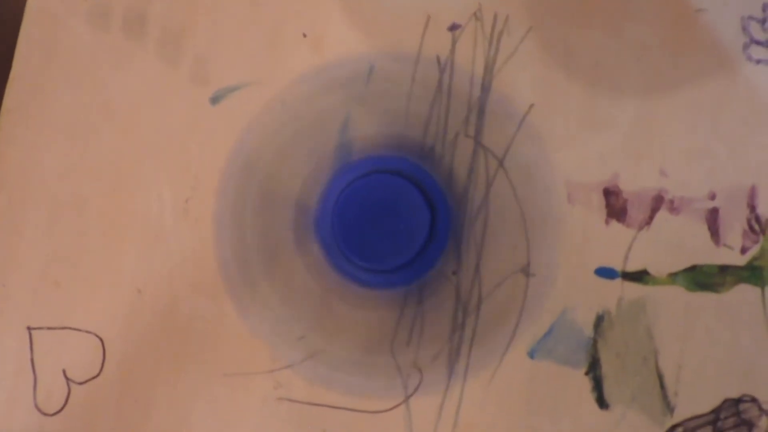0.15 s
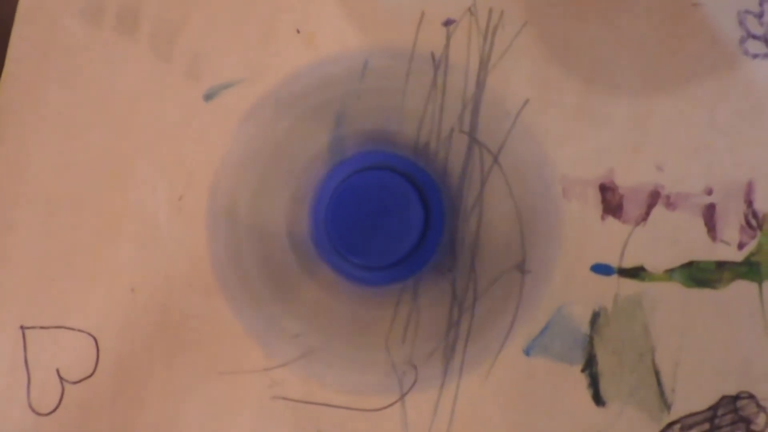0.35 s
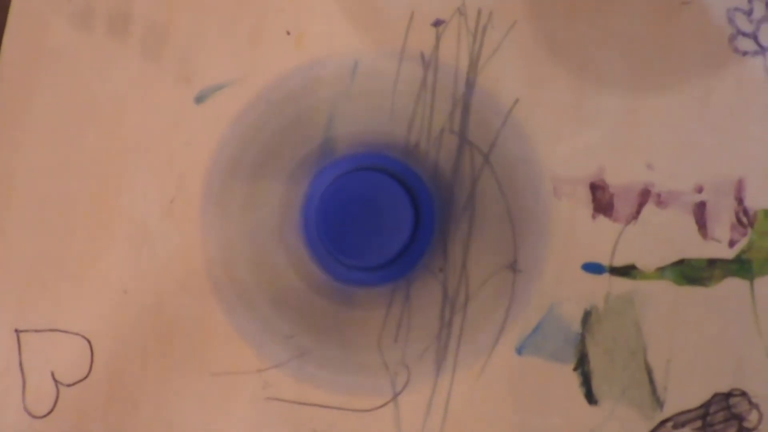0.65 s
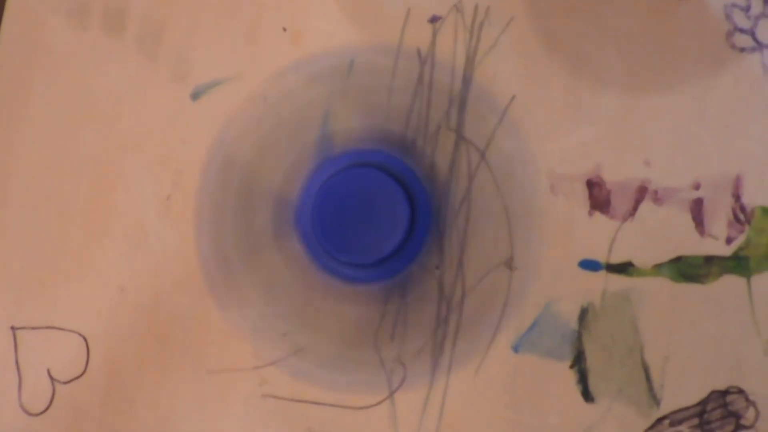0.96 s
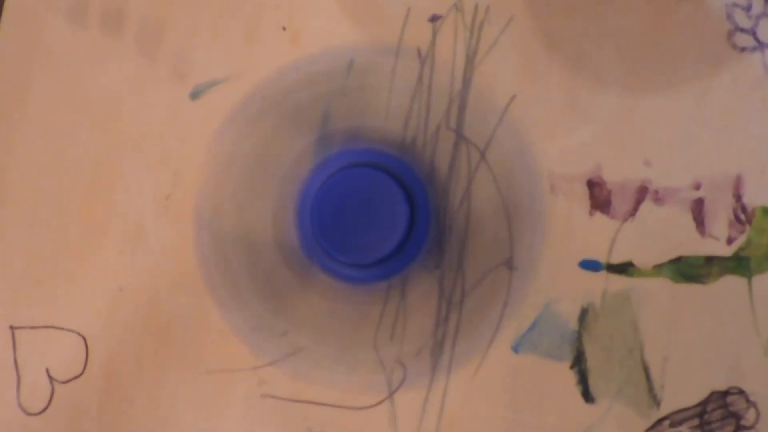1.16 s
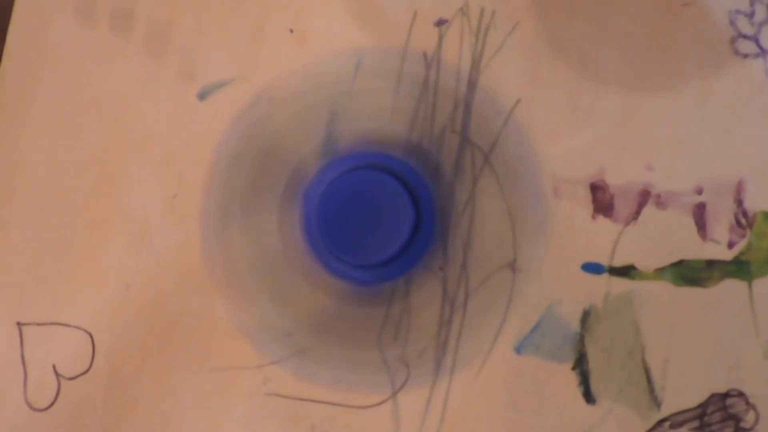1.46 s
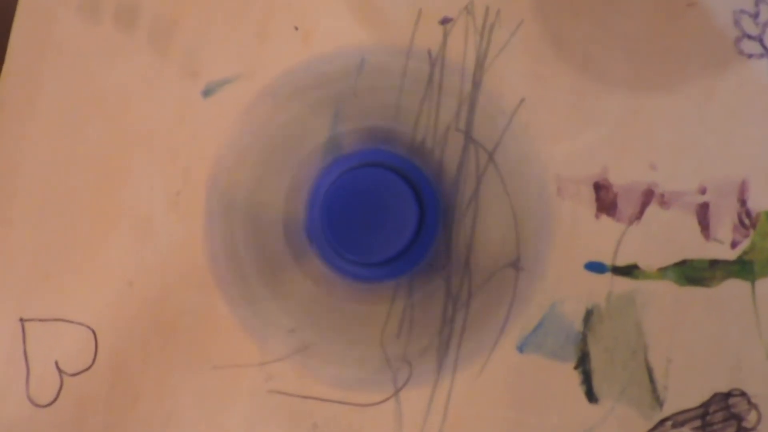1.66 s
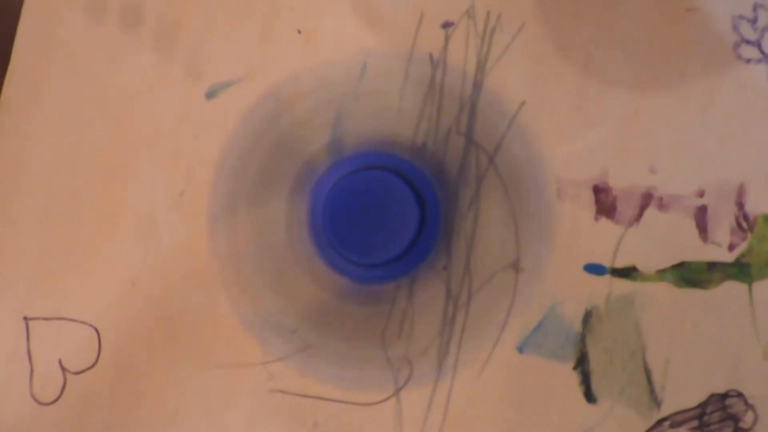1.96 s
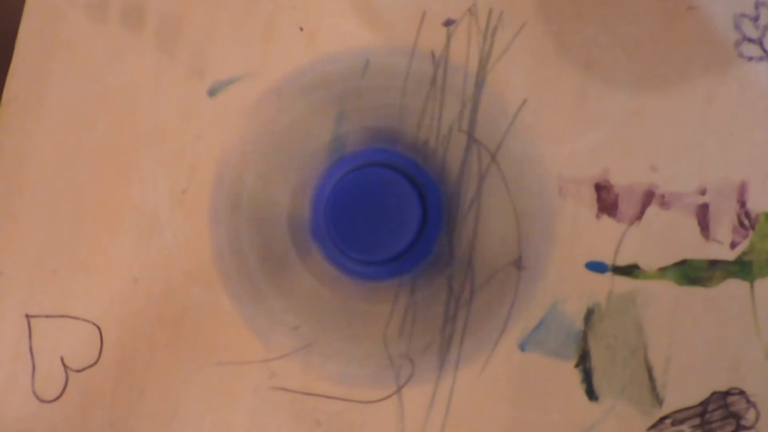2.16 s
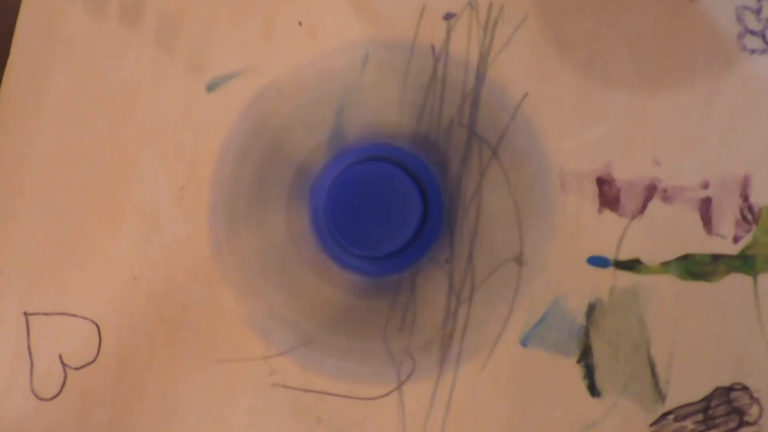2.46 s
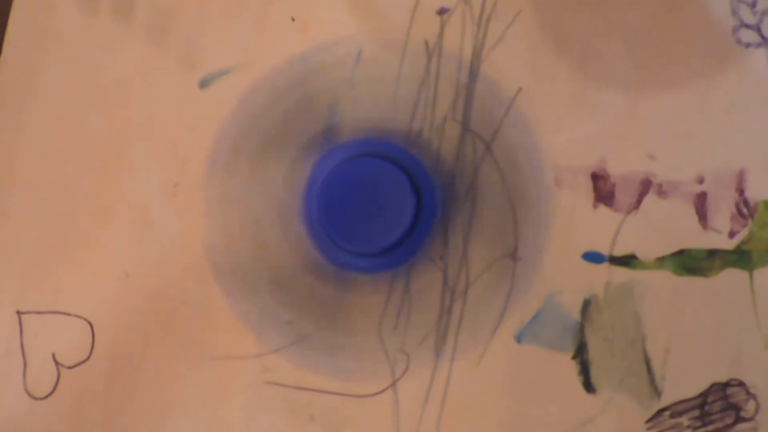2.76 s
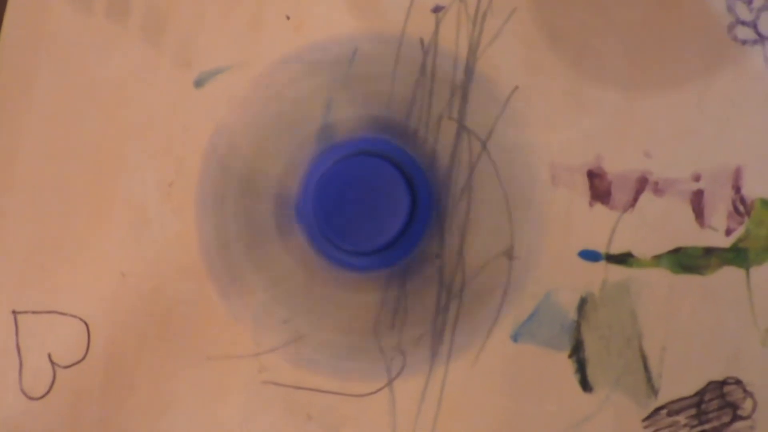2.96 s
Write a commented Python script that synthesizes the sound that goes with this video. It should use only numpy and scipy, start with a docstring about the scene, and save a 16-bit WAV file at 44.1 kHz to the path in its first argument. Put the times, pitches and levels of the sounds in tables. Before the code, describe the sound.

A toy spinner whirs on a paper-covered table, close to the microphone in a quiet room. Its bearing throbs rapidly and sinks slightly in pitch, with a light hiss and faint, scattered metallic pings.

```python
"""On a paper-covered table in a quiet room, a toy spinner coasts close to the microphone, slowly
losing speed. Six balls roll over the rough races of its bearing and drive the resonances of the
plastic body and the table top: a whir that throbs once a turn. Wavy races add sinking tones,
skidding balls add wavering ones, and now and then a ball catches and rings. The cage hisses as it
slides, the bearing has a thin metallic ring, and a faint low hum lies underneath."""
import sys
import numpy as np
from scipy import signal
from scipy.fft import rfft, irfft
from scipy.io import wavfile
from scipy.ndimage import map_coordinates

SR = 44100
rng = np.random.default_rng(int(sys.argv[2]) if len(sys.argv) > 2 else 0)


def file_out(sig):
    """Save sig as 16-bit WAV at sys.argv[1]."""
    # one column per channel
    cols = np.atleast_2d(sig).T
    # limit, then scale
    lim = np.clip(cols, -1, 1)
    pcm = np.round(lim * 32767).astype(np.int16)
    wavfile.write(sys.argv[1], SR, pcm)


N = 136710
BIN_HZ = np.fft.rfftfreq(N, 1 / SR)
SIDES = np.array([[.5], [-.5]])  # splits a left-minus-right difference between the channels

TURN_HZ, SLOWING_PER_S = 25.332, .0194  # starting speed and the share of it lost each second
BALLS, CAGE_RATIO = 6, .615  # the cage makes this part of a turn for each turn of the rotor
RING_PAN_DB = 3.5  # metallic ring and catches are louder on the left


def undb(db):
    """Decibels to amplitude gain."""
    return 10 ** (np.asarray(db) / 20)


def level(x, db):
    """Scale to an rms level."""
    return x * undb(db) / np.sqrt(np.mean(x ** 2))


def curve(points):
    """Interpolate (Hz, value) points over the spectrum on a log-frequency axis."""
    hz, value = np.array(points, float).T
    return np.interp(np.log(BIN_HZ + 1), np.log(hz), value)


def bump(hz, width):
    """Gaussian band of unit height over the spectrum."""
    return np.exp(-.5 * ((BIN_HZ - hz) / width) ** 2)


def causal(gain):
    """Causality: the minimum-phase response with this gain rings only after the push."""
    cepstrum = irfft(np.log(gain), N)
    cepstrum[1:N // 2] *= 2
    cepstrum[N // 2 + 1:] = 0
    return np.exp(rfft(cepstrum))


def walk(rate_hz):
    """Low-passed noise: a smooth random wander of unit rms."""
    lowpass = np.exp(-(BIN_HZ / rate_hz) ** 2)
    return level(irfft(rfft(rng.standard_normal(N)) * lowpass, N), 0)


def stereo_noise(colour, shared):
    """Partial coherence: coloured noise with a share of its power common to both channels."""
    noise = rng.standard_normal((3, N))
    pair = np.sqrt(shared) * noise[0] + np.sqrt(1 - shared) * noise[1:]
    return irfft(rfft(pair) * undb(curve(colour)), N)


def reflect(x, t60_s, send):
    """Diffuse reflection adds an exponentially decaying tail, different in each channel."""
    tail = rng.standard_normal((2, N)) * np.exp(-np.log(1000) * np.arange(N) / SR / t60_s)
    tail /= np.sqrt(np.sum(tail ** 2, axis=1, keepdims=True))
    return x + irfft(rfft(x) * rfft(tail) * send, N)


def background(t):
    """Ambient noise floor: the broadband air of the room and a faint low hum."""
    # spectrum of the still air: frequency_hz, density_db
    air_spectrum = [(15, -4.5), (42, -4), (75, -2), (130, -8), (320, -7), (600, -21.5), (2000, -21.5),
                    (15000, -35.5)]
    # partials of the hum: pitch_hz, level_db
    hum_partials = [(30, -64.5), (60, -70.5)]
    hum = sum(level(np.sin(2 * np.pi * (hz * t + rng.random())), db) for hz, db in hum_partials)
    return hum + level(stereo_noise(air_spectrum, shared=.66), db=-59)


def cage_hiss(turns):
    """Sliding friction of the cage makes broadband noise that sways with rotor and cage."""
    # spectrum of the friction: frequency_hz, density_db
    hiss_spectrum = [(2000, 4.5), (4200, -5), (5000, 2), (5400, 3.5), (6400, 3), (7300, -2.5), (8100, -3.5),
                     (9200, 1.5), (11200, -4.5), (13000, -3), (14200, -0.5), (15700, -4)]
    # thin resonances in the hiss: centre_hz, width_hz, gain_db
    hiss_peaks = [(4910, 62, 8.5), (6170, 220, 4), (9090, 110, 4.5)]
    sheen = undb(sum(db * bump(hz, width) for hz, width, db in hiss_peaks))
    hiss = irfft(rfft(stereo_noise(hiss_spectrum, shared=.17)) * sheen, N)
    hiss = reflect(hiss, t60_s=.069, send=undb(-4.5))  # off the table and the recorder
    sway_db = .5 * np.cos(2 * np.pi * (1 - CAGE_RATIO) * turns) - .3 * np.cos(2 * np.pi * turns)
    return level(hiss * undb(sway_db), db=-55.5)


def metal_ring(force, t, turns):
    """Narrow resonance of the bearing, driven by the contact force; it pings with rotor and cage."""
    # swell and ebb of the ring: time_s, level_db
    ring_levels = [(0, -55), (.45, -56), (1.0, -54.3), (1.45, -54.5), (1.8, -56), (2.4, -55), (3.1, -57)]
    ring_hz, width_hz, ping_at_turns = 2487, 44, .55
    response = bump(ring_hz, 2 * width_hz) / (1 + 2j * (BIN_HZ - ring_hz) / width_hz)
    rates = (1, CAGE_RATIO, 1 - CAGE_RATIO)  # rotor, cage, rotor past cage
    ping_db = 1.5 * sum(np.cos(2 * np.pi * (rate * turns - ping_at_turns)) for rate in rates)
    ring = level(irfft(rfft(force * undb(ping_db)) * response, N), 0)
    return ring * undb(np.interp(t, *np.array(ring_levels).T) + SIDES * RING_PAN_DB)


def catches(t):
    """Transient excitation: a ball catches, and one resonance swells quickly and dies away."""
    # rings of the catching balls: peak_s, pitch_hz, level_db
    catch_rings = [(.108, 2460, -52), (.375, 2480, -51), (.388, 760, -43), (.486, 1775, -47),
                   (0.927, 1320, -43), (.929, 2840, -50.5), (1.063, 2470, -48), (1.064, 1780, -45),
                   (1.103, 2460, -49), (1.204, 1314, -47), (1.264, 2480, -52), (1.388, 2490, -46),
                   (1.428, 1735, -48), (1.466, 2530, -46), (1.593, 2490, -47), (1.738, 1357, -42),
                   (1.923, 742, -40), (1.979, 1743, -45), (2.002, 720, -50), (2.006, 1325, -46),
                   (2.077, 1765, -47), (2.086, 730, -44), (2.3, 1335, -43), (2.333, 1357, -46),
                   (2.391, 1310, -51), (2.427, 1380, -52), (2.533, 2480, -47), (2.548, 1390, -56),
                   (2.658, 2790, -49), (2.789, 760, -47.5), (2.813, 1303, -43), (3.012, 1315, -46)]
    rise_s = .013
    rings = 0
    for (peak_s, hz, db), phase in zip(catch_rings, rng.random(len(catch_rings))):
        age = np.maximum((t - peak_s) / rise_s + 1, 0)
        envelope = undb(db) * (age * np.exp(1 - age)) ** 2
        rings += envelope * np.sqrt(2) * np.sin(2 * np.pi * (hz * (t - peak_s) + phase))
    return rings * undb(SIDES * RING_PAN_DB)


def skid_tones(turns):
    """Phase modulation: skidding balls sing with a wavering pitch and beat against the race tones."""
    # tones of the skidding balls: cycles_per_turn, level_db
    tones = [(30.5, -58.5), (44.3, -58), (54.5, -57.5)]
    waver_cycles = .26
    return sum(level(np.sin(2 * np.pi * (order * turns + waver_cycles * walk(rate_hz=6.1))), db)
               for order, db in tones)


def race_tones(turns):
    """Periodic forcing: wavy races sound harmonics of the turn rate, some shifted by the ball passes."""
    # harmonics of the wavy races: cycles_per_turn, level_db
    waviness = [(7, -70), (8, -75.5), (9, -65), (10, -69), (12, -66.5), (17, -73), (18, -68.5), (20, -65.5),
                (25, -61.5), (29, -67), (30, -54), (32, -63.5), (35, -69), (36, -57.5), (44, -55)]
    # passing balls beating with the turning race: cycles_per_turn_above_ball_pass, level_db
    ball_tones = [(29, -61.5), (32, -64), (35, -65), (38, -72), (41, -63), (42, -65.5), (43, -70.5),
                  (44, -59), (50, -69), (52, -63.5), (53, -72)]
    ball_pass, flutter_db = BALLS * (1 - CAGE_RATIO), 1.5
    tones = 0
    for order, db in waviness + [(order + ball_pass, db) for order, db in ball_tones]:
        tone = np.sin(2 * np.pi * (order * turns + rng.random()))
        tones += level(tone * undb(flutter_db * walk(rate_hz=15)), db)
    return tones


def rough_track(laps, starts, bumps):
    """Roughness excitation: contacts circle one ring and meet the same bumps on every lap."""
    profile = rng.standard_normal(bumps)
    contacts = (map_coordinates(profile, [(laps + start) % 1 * bumps], order=1, mode="grid-wrap")
                for start in starts)
    return level(sum(contacts), 0)


def bearing_force(turns):
    """Rolling contact: balls on both races, rotor rub and random slip sum to a fluctuating force."""
    # rough spots, struck once a turn, where the force jumps: position_turns, decay_turns, jump_db
    rough_spots = [(0.191, 0.095, 5), (0.558, 0.11, 1.5), (0.688, 0.095, 4.5), (.94, 0.01, 7.5)]
    seats = (np.arange(BALLS) + .033 * rng.standard_normal(BALLS)) / BALLS
    cage_turns = CAGE_RATIO * turns + .005 * walk(rate_hz=4)  # strays as the balls skid
    races = rough_track(cage_turns, seats, bumps=2048)
    races += rough_track(turns - cage_turns, -seats, bumps=3072)
    rub = undb(-5.5) * rough_track(turns, [0], bumps=1280)
    slip = undb(1.5) * rng.standard_normal(N)
    spots_db = sum(db * np.exp(-((turns - at) % 1) / decay) for at, decay, db in rough_spots)
    # the load sways with the cage, with its beat against the turning race, and at random
    cage_db = -.14 * np.cos(2 * np.pi * CAGE_RATIO * turns)
    beat_db = .26 * np.cos(2 * np.pi * (2 * CAGE_RATIO - 1) * turns)
    wander_db = .31 * walk(rate_hz=29)
    return (level(races, db=-2.5) + rub + slip) * undb(spots_db + cage_db + beat_db + wander_db)


def throb(x, turns):
    """Amplitude modulation: the rotating load swells certain resonances once or twice a turn."""
    # modulated bands: centre_hz, width_hz, swells_per_turn, swing_db, position_turns
    bands = [(730, 200, 1, 1.5, 0.7), (750, 41, 2, 1, 0.15), (1315, 26, 1, -0.2, 0.34)]
    spectrum = rfft(x)
    for hz, width, swells, db, at in bands:
        swing = undb(db * np.cos(2 * np.pi * swells * (turns - at)))
        x = x + irfft(spectrum * bump(hz, width), N) * (swing - 1)
    return x


def whir(vertical, sideways):
    """Forced vibration: two forces drive the modes of body and table, heard at two microphone ports."""
    # broad response under the modes: frequency_hz, gain_db
    body = [(100, -32), (330, -23), (450, -15), (560, -11), (900, -6), (1180, -12.5), (1650, -6),
            (2300, -14.5), (2950, -19), (3400, -18), (4200, -27), (7000, -42.5), (15000, -48.5)]
    # resonances of body and table: centre_hz, width_hz, gain_db, left_minus_right_db
    modes = [(650, 68, -5, 0), (743, 64, 0.5, 1.5), (864, 29, -4.5, -13.5), (906, 87, -1.5, 4.5),
             (1004, 51, -8, 16.5), (1106, 56, 0.1, -1), (1218, 19, -6, -13.5), (1326.5, 38, 4, 5),
             (1514, 41, -1.5, 5), (1743, 37, -1.5, -1), (1945, 304, -5.5, 4.5), (2360, 210, -11.5, 6),
             (2684, 71, -11, 10), (2832, 78, -7, -2), (2940, 39, -9, -4), (3190, 45, -21, 23)]
    # antiresonances of body and table: centre_hz, width_hz, depth_db
    dips = [(827, 13, 2), (1181, 15.4, 4.5), (2470, 37, 8), (2670, 31, 4.5), (3036, 72, -3),
            (3390, 48, 5.5)]
    # phase lead of the left port: frequency_hz, lead_rad
    port_phase = [(100, 0), (1150, 0), (1260, .7), (1350, -.6), (1520, 1.4), (1680, -.3), (2200, 0),
                  (2550, .6), (2700, -2.6), (2880, 0), (3100, -1.2), (4500, -.6), (9000, .8)]
    # sideways rocking against the vertical push, opposite at the two ports: frequency_hz, gain_db
    rocking = [(300, -2.5), (700, -17.5), (1080, -28), (1400, -2.5), (1750, -10), (2200, 1), (2600, 1),
               (3200, -3), (6000, -7)]
    # room sound against the direct whir: frequency_hz, gain_db
    room_send = [(700, -31), (2000, -14), (6000, 1.5)]
    power = undb(curve(body)) ** 2
    for hz, width, db, pan_db in modes:
        power = power + undb(db + SIDES * pan_db) ** 2 / (1 + 2 * ((BIN_HZ - hz) / width) ** 2) ** 2
    gain = np.sqrt(power) * undb(-sum(db * bump(hz, width) for hz, width, db in dips))
    phase = np.angle(causal(gain.mean(axis=0))) + SIDES * curve(port_phase)
    drive = rfft(vertical) + 2 * SIDES * undb(curve(rocking)) * rfft(sideways)
    direct = irfft(drive * gain * np.exp(1j * phase), N)
    return level(reflect(direct, t60_s=.15, send=undb(curve(room_send))), db=-40.5)


def scene():
    """Superposition: the sounds of one uniformly slowing rotation add to those of the room."""
    t = np.arange(N) / SR
    turns = TURN_HZ * (t - SLOWING_PER_S * t ** 2 / 2)
    vertical, sideways = bearing_force(turns), bearing_force(turns)
    rolling = throb(whir(vertical, sideways) + race_tones(turns) + skid_tones(turns), turns)
    rolling_fade_db_per_s, hiss_fade_db_per_s = .27, .6  # quieter as it slows
    since_middle_s = t - t.mean()
    rolling *= undb(-rolling_fade_db_per_s * since_middle_s)
    hiss = cage_hiss(turns) * undb(-hiss_fade_db_per_s * since_middle_s)
    return rolling + metal_ring(vertical, t, turns) + hiss + background(t) + catches(t)


def record(dry):
    """Band limiting: the recorder's steep low-pass filter cuts the highest treble."""
    cutoff_hz = 15520
    return signal.sosfilt(signal.ellip(10, .1, 70, cutoff_hz, fs=SR, output="sos"), dry)


dry = scene()
out = record(dry)
file_out(out)
```